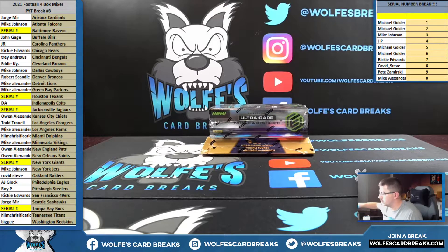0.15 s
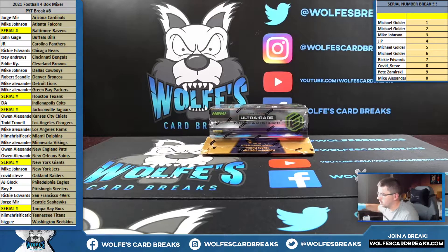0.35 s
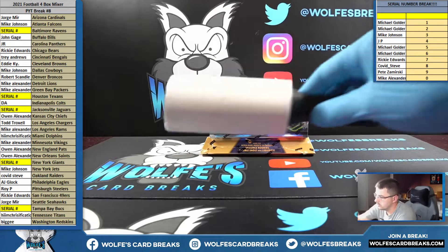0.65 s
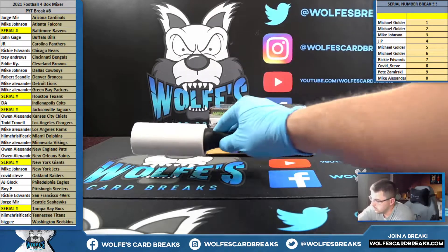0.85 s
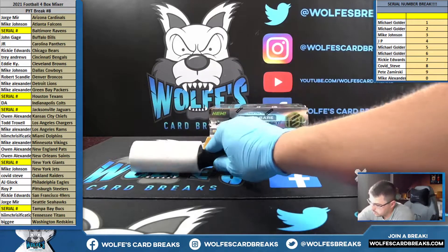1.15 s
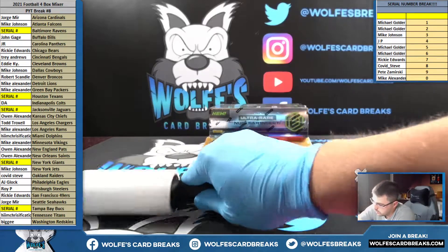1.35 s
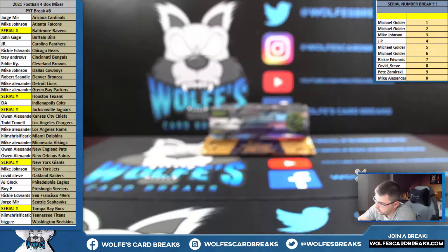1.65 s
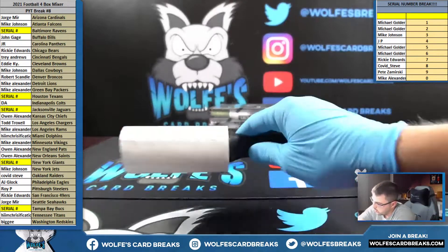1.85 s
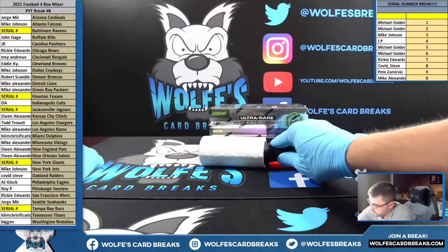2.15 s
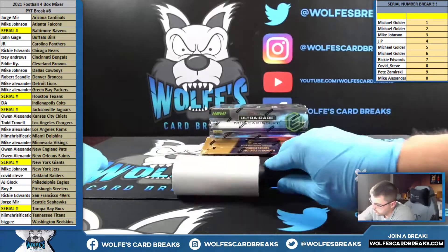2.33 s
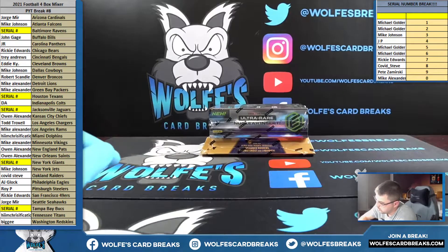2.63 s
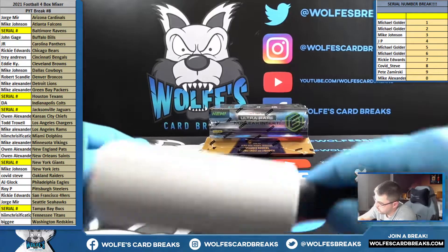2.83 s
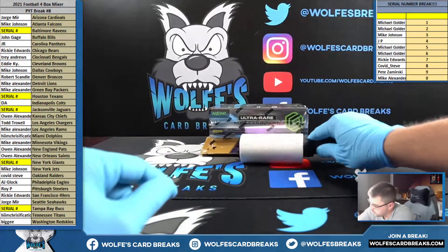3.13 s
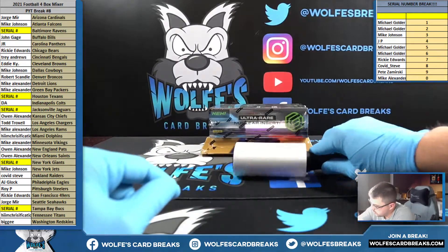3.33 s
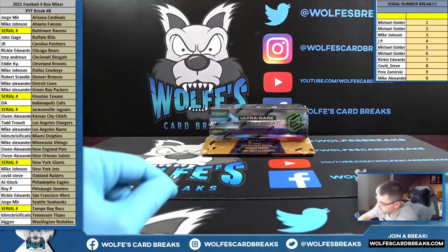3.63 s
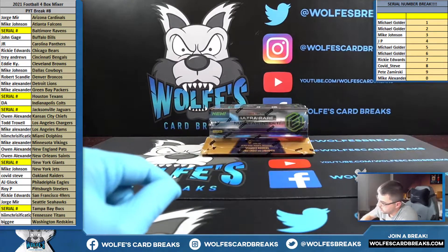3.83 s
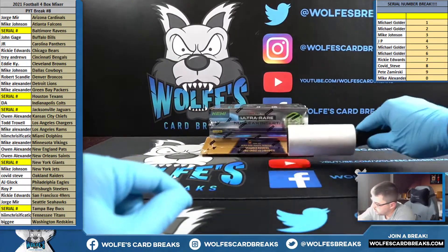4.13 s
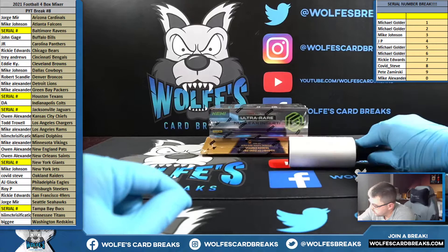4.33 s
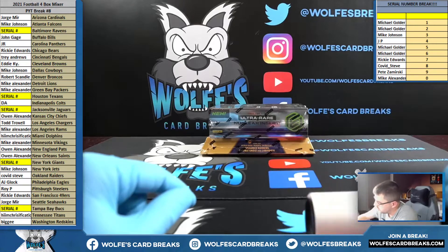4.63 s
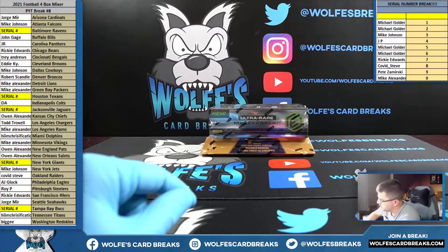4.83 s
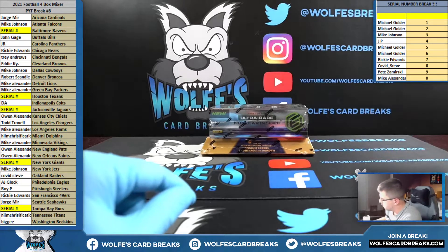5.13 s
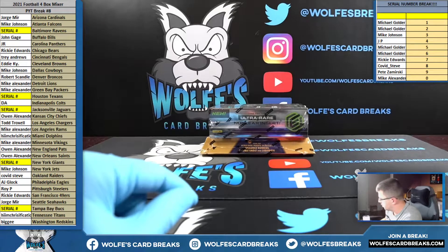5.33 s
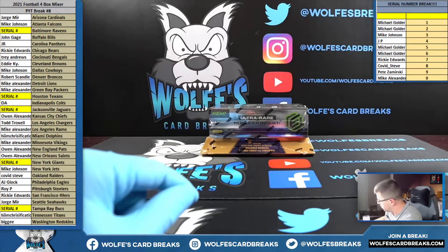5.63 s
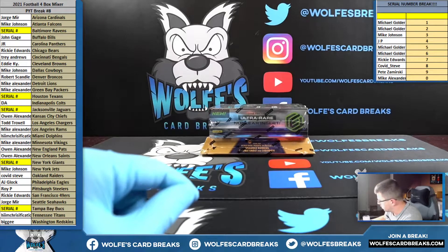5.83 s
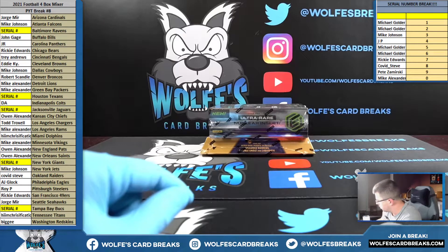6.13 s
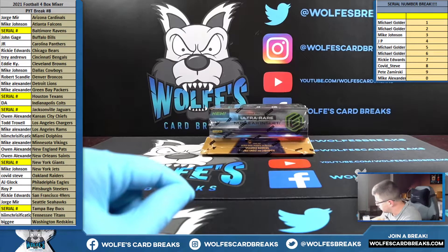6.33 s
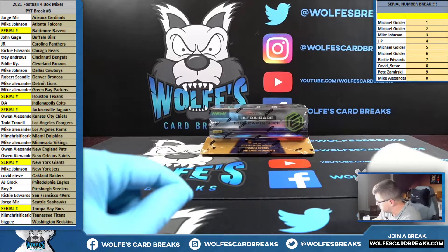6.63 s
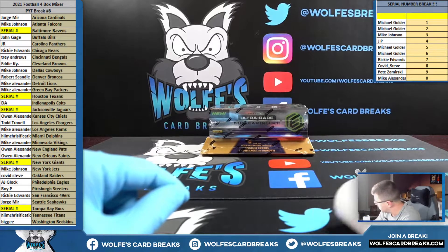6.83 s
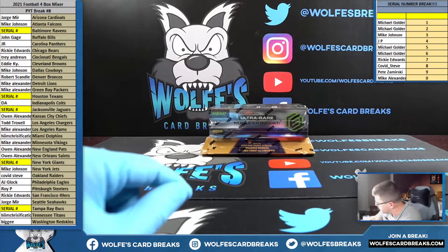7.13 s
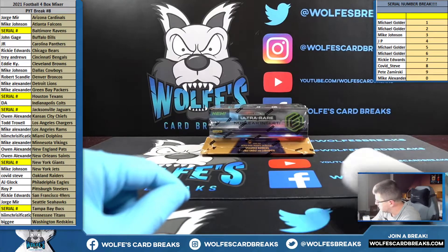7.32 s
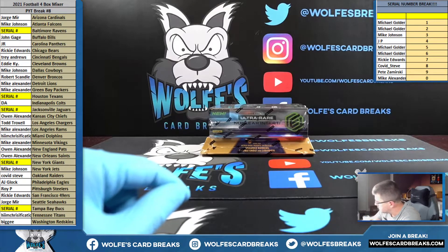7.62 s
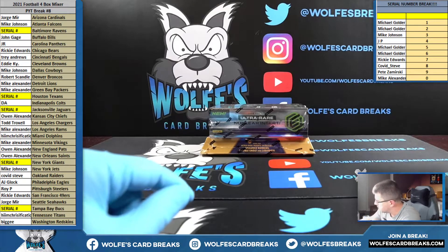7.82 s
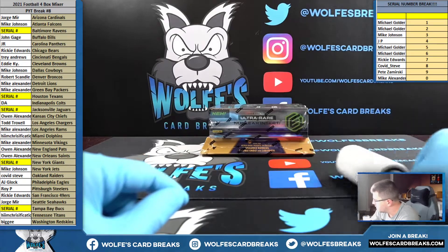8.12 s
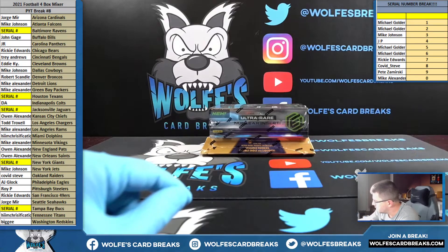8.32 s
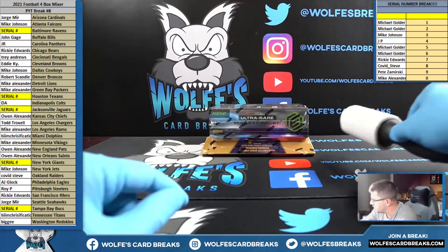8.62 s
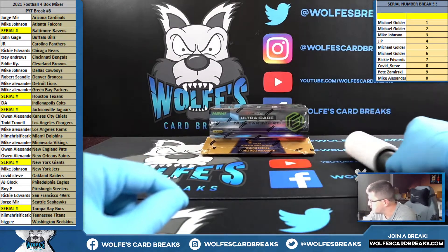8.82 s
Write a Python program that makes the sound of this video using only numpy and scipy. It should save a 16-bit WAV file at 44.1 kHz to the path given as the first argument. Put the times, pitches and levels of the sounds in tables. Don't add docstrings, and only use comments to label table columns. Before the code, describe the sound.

Sticky tape-like tearing comes in separate bursts as a lint roller rolls over a mat. The hollow roll clacks on its handle and the table answers with dull, rumbling thuds. Between bursts there are tiny rustles, faint air hiss and low hum. Four longer pulls are followed by five shorter, more hurried ones with firmer knocks, heard close and dry with only a little room reverberation.

```python
import sys
import numpy as np
from scipy import signal
from scipy.fft import rfft, irfft
from scipy.io import wavfile
from scipy.ndimage import uniform_filter1d, map_coordinates

SR = 44100
rng = np.random.default_rng(int(sys.argv[2]) if len(sys.argv) > 2 else 0)


def put_to_file(sound):
    columns = np.atleast_2d(sound).T
    safe = np.clip(columns, -1, 1)
    whole_steps = np.round(safe * 32767)
    wavfile.write(sys.argv[1], SR, whole_steps.astype(np.int16))


def amplitude_ratio(level_db):
    exponent = np.asarray(level_db, float) / 20
    return 10 ** exponent


N = 395577

# (touch-down [s], wait before the pull [s], speeding up [s], steady pull [s],
#           peel level at full speed [dB])
STROKES = [(-0.5, 0.1, 0.2, 0.2, -47), (0.95, 0.11, 0.1, 0.44, -44), (2.015, 0.075, 0.2, 0.38, -44),
           (3.1, 0.103, 0.165, 0.355, -44.5), (4.183, 0.06, 0.18, 0.41, -46.5),
           (5.296, 0.092, 0.16, 0.14, -44), (6.045, 0.033, 0.09, 0.2, -44.5),
           (6.72, 0.045, 0.08, 0.13, -45), (7.34, 0.05, 0.04, 0.18, -45.5), (8.01, 0.033, 0.07, 0.195, -49),
           (8.69, 0.025, 0.155, 0.06, -46)]
# (multiple of its ring [1], level [dB], t60 [s])
ROLL_MODES = [(1.002, 4.3, 0.045), (1.15, -3, 0.036), (1.9, -25, 0.04)]
RUSTLE_EDGE_DB = -14


def level(x, db):
    return x * amplitude_ratio(db) / np.sqrt(np.mean(x ** 2))


def colour(x, points):
    hz, db = np.transpose(points)
    size = 8192
    bins = np.maximum(np.fft.rfftfreq(size, 1 / SR), 1)
    log_gain = np.interp(np.log(bins), np.log(hz), db) * np.log(10) / 20
    cepstrum = irfft(log_gain)
    cepstrum[1:size // 2] *= 2
    cepstrum[size // 2 + 1:] = 0
    response = irfft(np.exp(rfft(cepstrum)))
    return signal.fftconvolve(x, response)[:N]


def high(x, hz):
    return signal.sosfilt(signal.butter(2, hz, "high", fs=SR, output="sos"), x)


def ring(modes, seconds, travel=0.):
    t = np.arange(int(seconds * SR)) / SR
    out = 0
    for hz, db, t60 in modes:
        since = np.maximum(t - travel / np.sqrt(hz), 0)
        decay = np.exp(-np.log(1000) * since / t60)
        out = out + amplitude_ratio(db) * np.sin(2 * np.pi * hz * since) * decay
    return out


def add(out, s, sound):
    i = max(int(s * SR), 0)
    out[i:i + len(sound)] += sound[:N - i]


def walk(rate):
    k = int(SR / rate)
    held = np.repeat(rng.standard_normal(N // k + 1), k)
    return 2.07 * uniform_filter1d(held, k)[:N]


def grains(per_s, scatter_db):
    hit = rng.random(N) < per_s / SR
    return hit * rng.standard_normal(N) * amplitude_ratio(scatter_db * rng.exponential(size=N))


def patches(shape, per_s, per_khz):
    rows = np.linspace(0, per_khz * SR / 2000, shape[0])
    cols = np.linspace(0, per_s * N / SR, shape[1])
    relief = rng.standard_normal((200, 800))
    return 1.37 * map_coordinates(relief, np.meshgrid(rows, cols, indexing="ij"), order=1)


def every_ms():
    return np.arange(0, N / SR + .002, .001)


def along(rows):
    s, *columns = np.transpose(rows)
    return [np.interp(np.arange(N) / SR, s, c) for c in columns]


def hush():
    # (frequency [Hz], density [dB per Hz])
    air_shape = [(18, -13), (27, -8), (31, -37), (42, -17), (62, -5), (80, -10), (90, -23.5), (115, -10),
                 (150, -22.5), (240, -15.5), (300, -23), (620, -25), (1000, -32.5), (2100, -38.5),
                 (3300, -48.5), (16000, -56)]
    # (frequency [Hz], level [dB])
    hum_tones = [(25, -58.5), (60, -58.5), (119, -71)]
    air = level(colour(rng.standard_normal(N), air_shape), -55.5) * amplitude_ratio(.7 * walk(9))
    t = np.arange(N) / SR
    hum = 0
    for hz, db in hum_tones:
        hum = hum + np.sqrt(2) * amplitude_ratio(db + 1.7 * walk(4.1)) * np.sin(2 * np.pi * hz * t)
    return air + hum


def stray_bands(mid):
    hz, s, spectrum = signal.stft(mid, SR, nperseg=1024)
    chance = rng.random((len(hz) // 24 + 1, len(s) // 3 + 1))
    tiles = np.kron(chance < .06, np.ones((24, 3)))[:len(hz), :len(s)]
    turns = np.exp(2j * np.pi * rng.random(spectrum.shape))
    treble = hz[:, None] > 10000
    return signal.istft(spectrum * turns * tiles * treble, SR, nperseg=1024)[1][:N]


def room(x):
    t60_s, tail_db = 0.37, -13.5
    t = np.arange(SR // 2) / SR
    tail = rng.standard_normal(len(t)) * np.exp(-np.log(1000) * t / t60_s) * (t > .004)
    tail = signal.lfilter([1], [1, -.4], tail)
    return signal.fftconvolve(x, tail / np.sqrt(np.sum(tail ** 2)))[:N] * amplitude_ratio(tail_db)


def leaning(column, slopes, rest_db, lead_s=0.):
    # (time [s], rolling rumble [dB], sway [dB])
    load = [(1.15, -57, -49), (1.42, -40, -47), (2.44, -39, -33), (3.5, -39, -36), (4.3, -62, -45),
            (4.6, -42, -36), (5.58, -41, -42), (6.22, -35, -41), (6.45, -58, -40), (6.9, -34, -42),
            (7.5, -43, -36), (8.17, -44, -35), (8.86, -42, -41)]
    t = every_ms()
    power = amplitude_ratio(rest_db) ** 2
    for row in load:
        since = t - row[0] + lead_s
        fall_db = np.maximum(-slopes[0] * since, slopes[1] * since)
        power = power + amplitude_ratio(row[column] - fall_db) ** 2
    return along(np.transpose([t, 10 * np.log10(power)]))[0]


def desk(rumble_db, sway_db):
    # (frequency [Hz], level [dB], t60 [s])
    panel_modes = [(106.6, -2.5, 0.34), (149.6, -3, 0.38), (184.7, -2.5, 0.37), (238, -0.5, 0.17),
                   (265.9, 0.46, 0.18), (305, -0.5, 0.16), (334.4, -4, 0.26), (364, -5.5, 0.21),
                   (402.3, -6, 0.069), (448.6, -9, 0.17), (511, -6, 0.069), (612, -11, 0.09),
                   (780, -15, 0.04), (1050, -21, 0.03)]
    # (frequency [Hz], level [dB], t60 [s])
    leg_modes = [(66.8, -2.2, 0.43), (101.9, -2.5, 0.39)]
    # (time [s], peak [dB], contact [ms], tilt [dB per octave])
    landings = [
        (0.949, -29.5, 1.9, 2),
        (3.088, -33, 3.6, -2),
        (4.177, -28, 2.6, 0),
        (5.29, -22.5, 1.7, -0.7),
        (6.036, -14.5, 1.3, -0.3),
        (6.707, -15.5, 0.94, 1.5),
        (7.327, -20, 2.0, -3),
        (7.999, -21.5, 1.5, 0.3),
        (8.676, -22.5, 2.7, 1),
    ]
    # (time [s], peak [dB], contact [ms], tilt [dB per octave])
    rolling_bumps = [(1.291, -15, 1.2, 8.5), (1.526, -18.5, 2.5, -0.5), (2.211, -30.5, 2.4, -2),
                     (2.338, -22.5, 2.0, -4), (2.413, -21, 2.5, -1), (2.592, -20, 2.9, -2),
                     (3.308, -26.5, 4.2, 0.3), (3.388, -27.5, 2.0, 0.3), (3.42, -20, 1.9, 0.3),
                     (3.503, -24, 1.76, -1), (3.691, -33, 1.4, -1), (4.461, -23.5, 3.2, -6),
                     (4.508, -18.5, 2.6, 0), (4.644, -21.5, 3.1, 1.5), (4.816, -31.5, 2.5, -1),
                     (5.434, -23, 4, -3), (5.52, -25.5, 2.55, -1), (6.228, -17.5, 2.6, -0.5),
                     (6.347, -27.5, 1.4, 3.5), (6.82, -23, 2.8, -3), (6.866, -15, 2.0, -3.5),
                     (7.464, -22.5, 2.6, 0), (8.118, -25, 3.1, -6), (1.322, -25, 1.8, 6),
                     (1.343, -25, 1.8, 6), (2.006, -40, 3, -2), (2.305, -30, 2.5, -1), (5.611, -25, 2.5, 0),
                     (6.164, -24, 2, 1), (6.719, -24, 1, 3), (6.736, -23, 1.3, 2), (6.994, -24, 2.5, 0),
                     (7.49, -25, 2.5, 0), (8.028, -33, 2, 1), (8.26, -33, 3, -2), (8.775, -30, 2.6, -1),
                     (8.845, -31, 2.4, 0)]
    lumps = uniform_filter1d(grains(1100, 1.4), size=60)
    rumble = high(signal.fftconvolve(lumps, ring(panel_modes, .3, 0.0826))[:N], 98.0)
    bumps = np.zeros(N)
    thuds = sorted(landings + rolling_bumps)
    place_db = 2 * rng.standard_normal((len(thuds), len(panel_modes)))
    for (s, db, ms, tilt_db), place in zip(thuds, place_db):
        shove = np.hanning(int(ms * SR / 1000) + 2)
        modes = [(hz, d + p + tilt_db * np.log2(hz / 250), t60)
                 for (hz, d, t60), p in zip(panel_modes, place)]
        panel = ring(modes + [(227, 7.0, 0.03)], 0.32, 0.031)
        thud = signal.fftconvolve(panel, shove / shove.sum())
        add(bumps, s + 0.0039, -thud * amplitude_ratio(db - 11))
    sway = signal.fftconvolve(rng.standard_normal(N), ring(leg_modes, .8))[:N]
    bumps = high(high(bumps, 86.0), 87.0)
    rumble = level(rumble, -0.44) * amplitude_ratio(rumble_db)
    return bumps + rumble + level(high(sway, 40.0), -1.07) * amplitude_ratio(sway_db)


def coasting():
    # (time [s], level [dB])
    coast = [
        (1.62, -75),
        (1.66, -67),
        (1.84, -68),
        (1.93, -80),
    ]
    # (frequency [Hz], width [Hz], level [dB])
    handle = [(1340, 100, -3), (1700, 70, 1), (2140, 70, -3), (2620, 92, -6), (3390, 60, -2.5)]
    modes = [(hz, db, np.log(1000) / (np.pi * width)) for hz, width, db in handle]
    rub = signal.fftconvolve(grains(3000, 1.7), ring(modes, .06))[:N]
    inside = np.abs(np.arange(N) / SR - 1.775) < .16
    return level(rub, 0) * amplitude_ratio(along(coast)[0] + 1.4 * walk(30.1)) * inside


def scraping():
    # (time [s], half length [s], level [dB], frequency
    # [Hz])
    narrow_bursts = [(1.2, 0.1, -53, 2200), (1.335, 0.045, -33, 345), (8.72, 0.04, -58, 1000),
                     (2.026, 0.012, -63, 2150), (2.076, 0.01, -58, 1500), (4.195, 0.012, -52, 2200),
                     (4.385, 0.08, -50.5, 2120), (2.076, 0.01, -52, 2200), (1.55, 0.04, -59, 680),
                     (1.42, 0.14, -57, 1600), (1.76, 0.14, -68, 1500), (2.5, 0.06, -55, 600),
                     (3.71, 0.04, -54, 620), (5.35, 0.025, -53, 740), (5.195, 0.012, -71, 4600),
                     (5.3, 0.06, -66, 7200), (5.35, 0.02, -62, 5300), (5.82, 0.03, -69, 6900),
                     (5.55, 0.04, -57, 700), (5.7, 0.05, -58, 620), (6.2, 0.06, -51, 600), (6.4, 0.035, -57, 950),
                     (6.93, 0.05, -59, 800), (7.05, 0.03, -62, 700), (7.86, 0.04, -61, 750), (8.15, 0.03, -51, 650),
                     (8.24, 0.05, -56, 640), (8.86, 0.05, -56, 620)]
    ring_cycles = 22
    out, friction = np.zeros(N), grains(5000, 1.5)
    for s, half, db, hz in narrow_bursts:
        i, k = int((s - 2 * half) * SR), int(4 * half * SR)
        sound = signal.fftconvolve(friction[i:i + k], ring([(hz, 0, ring_cycles / hz)], .04))[:k]
        fade = amplitude_ratio(RUSTLE_EDGE_DB * np.linspace(-2, 2, k) ** 2)
        add(out, i / SR, level(sound, db) * fade)
    return out


def slaps():
    # (time [s], peak [dB], treble [dB])
    cracks = [(0.0014, -51, 2), (0.9446, -34.5, -23), (0.9836, -46, -40), (1.0385, -46, -16),
              (2.0053, -58, -6), (2.0662, -50, -8), (2.0735, -40, -22), (2.2238, -49, -11),
              (2.6035, -48, -10), (3.0929, -46, -17), (3.5159, -42, -12), (4.1898, -37.5, -23),
              (4.2353, -51, -11), (4.5127, -32, -16), (5.3038, -41.5, -25), (5.782, -46, -12),
              (5.899, -59, -18), (6.0398, -41.5, -19), (6.113, -43, -12), (6.3723, -39, -15),
              (6.4617, -52, -14), (6.7131, -41, -38), (7.334, -44, -20), (7.39, -44, -6), (7.419, -44, -4),
              (7.8416, -58, -22), (7.866, -60, -6), (6.089, -44, -8), (6.762, -47, -8), (7.047, -51, 0),
              (8.039, -47, -8), (8.312, -50, -10), (8.623, -60, -25), (7.345, -48, -22),
              (8.0042, -37.5, -23), (8.2073, -37, -4), (8.3963, -53, -14), (8.6584, -56, -6),
              (8.6843, -34, -10)]
    out = np.zeros(N)
    t = np.arange(SR // 10) / SR
    noise = rng.standard_normal((len(cracks), len(t)))
    for (s, db, treble_db), hiss in zip(cracks, noise):
        crack = hiss * (np.exp(-t / 0.0042) + 0.28 * np.exp(-t / 0.0092))
        top = high(crack, 5800.0)
        add(out, s, amplitude_ratio(db - 3) * (crack + top * (amplitude_ratio(treble_db + 10.0) - 1)))
    return colour(out, [(300, 4), (1400, 0), (2300, 11.0), (5000, 1.0), (16000, -11)])


def swell(sound):
    return sound * (1 - np.exp(-np.arange(len(sound)) / SR / .002))


def ticks():
    # (time [s], peak [dB], ring [Hz])
    grip_ticks = [(1.339, -39, 522), (2.055, -47, 638), (2.286, -44, 888), (2.484, -41, 770),
                  (3.379, -47, 705), (3.431, -42, 659), (3.705, -44, 565), (4.867, -49, 727),
                  (5.537, -43, 522), (5.699, -44, 600), (5.775, -45, 603), (6.109, -45, 576),
                  (6.185, -41, 584), (6.283, -41, 649), (6.35, -38, 800), (6.373, -37, 589),
                  (6.739, -33, 528), (6.813, -39, 650), (6.921, -43, 584), (6.949, -40, 680),
                  (7.419, -48, 832), (7.433, -26.5, 680), (7.459, -38, 900), (7.483, -33, 603),
                  (7.615, -31, 600), (7.844, -48, 746), (8.079, -33, 732), (8.119, -32, 705),
                  (8.131, -32, 660), (8.229, -46, 581), (8.31, -43, 1000), (8.316, -42, 614)]
    # (multiple of the ring [1], level [dB], t60 [s])
    upper_modes = [(1.45, -6, .016), (2.1, -18, .012)]
    damping = .6
    out = np.zeros(N)
    for s, db, hz in grip_ticks:
        modes = [(hz * k, d, t60 * damping) for k, d, t60 in ROLL_MODES]
        modes += [(hz * k, d, t60) for k, d, t60 in upper_modes]
        add(out, s - .0018, swell(ring(modes, .05)) * amplitude_ratio(db - 5))
    return out


def rattle():
    # (time [s], peak [dB], ring [Hz])
    knocks = [(0.986, -44, 740), (1.03, -46, 714), (1.257, -47.5, 619), (1.299, -33, 638),
              (1.352, -36, 697), (1.635, -46.5, 590), (2.072, -39, 672), (2.227, -48, 635),
              (2.349, -30.5, 650), (2.599, -45, 690), (3.251, -39, 650), (3.326, -44, 670),
              (3.399, -44, 656), (3.445, -37, 673), (3.513, -43, 630), (4.363, -45, 686),
              (4.473, -37.5, 723), (4.512, -43, 640), (4.653, -44.5, 704), (8.7, -49, 720)]
    # (time [s], peak [dB], ring [Hz])
    jolts = [
        (0.014, -36.5, 700),
        (0.948, -42, 625),
        (2.011, -50, 647),
        (3.111, -50, 670),
        (4.19, -33, 730),
        (5.327, -41, 640),
        (6.043, -33, 588),
        (6.712, -35.5, 556),
        (7.335, -45.5, 674),
        (8.004, -46, 753),
    ]
    out = np.zeros(N)
    hits = sorted(jolts + knocks)
    chance = rng.standard_normal((len(hits), len(ROLL_MODES) + 1))
    for (s, db, hz), draw in zip(hits, chance):
        third_db = -16 + 28 * np.log2(hz / 650)
        modes = [(hz * k, d + 1.2 * c, t60) for (k, d, t60), c in zip(ROLL_MODES, draw)]
        modes += [(.87 * hz, -8, .03), (3.02 * hz, third_db, .03), (3.17 * hz, third_db - 4, .015)]
        knock = swell(ring(modes, .1))
        add(out, s - .0018, knock * amplitude_ratio(db + 2.5))
        add(out, s + 0.02 + 0.00417 * draw[-1], knock * amplitude_ratio(db - 9.5))
    return out


def catching():
    # (time [s], peel change [dB])
    hops = [(1.278, -5.0), (1.347, -3.0), (1.372, -2.5), (1.461, 2.5), (1.53, -4.5), (1.541, 3.0),
            (2.132, 2.0), (2.156, -3.0), (2.214, -5.0), (2.321, -6.0), (2.391, 2.0), (2.42, -4.0),
            (2.595, -4.5), (2.609, 2.0), (3.313, -4.0), (3.412, -4.5), (3.434, -2.5), (3.471, 2.0),
            (3.509, -4.5), (3.575, 2.0), (3.692, -6.5), (3.709, 3.0), (4.352, -2.5), (4.382, 3.0),
            (4.464, -3.0), (4.483, 2.0), (4.5, -4.5), (4.59, 2.0), (4.65, -3.5), (5.437, -4.5), (5.51, 2.5),
            (5.61, -3.0), (5.664, 2.0), (6.107, -5.5), (6.167, 4.5), (6.195, 4.5), (6.229, -3.5),
            (6.263, -2.5), (6.299, 2.5), (6.318, -5.0), (6.811, 2.0), (6.837, 4.5), (6.924, 3.5),
            (6.952, 5.0), (7.445, 4.5), (7.502, -4.5), (7.54, 3.5), (7.569, -6.0), (7.59, 5.5),
            (8.053, -3.0), (8.123, 6.5), (8.15, -5.0), (8.21, 7.0), (8.741, 3.5), (8.777, -9.5),
            (8.847, 3.0), (8.864, -2.5), (8.877, 4.5)]
    t = every_ms()
    change_db = sum(db * np.exp(-((t - s) / .008) ** 2) for s, db in hops)
    return along(np.transpose([t, change_db]))[0] * .88


def places():
    # (sheen band [dB], top octave [dB])
    mat_places = [(0, 1), (-1, 0), (0, 1), (0, 0), (0, -1), (2.5, -5), (3, -3), (2, -2), (0, 0), (0, 0),
                  (0, 1)]
    stroke = np.searchsorted(np.transpose(STROKES)[0], np.arange(N) / SR) - 1
    return np.transpose(mat_places)[:, stroke]


def pulling():
    # (first tug under full speed [dB], tiring [dB], brightness [dB],
    #                       favoured band [Hz], lift-off [dB per s])
    grips = [(-8, -4, -6, 2300, 220), (-16, -3, -4, 2700, 260), (-10, -3, -4, 2800, 270),
             (-8.5, -4, -4.5, 2750, 330), (-12, -1, -3, 2550, 270), (-7, -11, -2.5, 2850, 240),
             (-5, -9, -1, 3200, 200), (-5, -3, -2, 3150, 190), (-3, 0, -2.5, 2950, 350),
             (-2, -9, -2, 2950, 330), (-9, -2, -1, 3000, 250)]
    # (time [s], half length [s], level [dB], brightness [dB])
    rustles = [(0.4, 0.3, -84, -3), (0.05, 0.1, -75, 2), (0.72, 0.3, -74, -2), (1.02, 0.07, -63, -5),
               (1.8, 0.15, -69, -7), (2.95, 0.3, -79, -2), (4.0, 0.3, -73, -9), (5.03, 0.06, -69, 1),
               (5.27, 0.04, -71, -8), (5.8, 0.05, -65, -7), (7.19, 0.12, -74, -12), (7.284, 0.03, -68, -5),
               (6.69, 0.02, -73, -8), (7.85, 0.04, -73, -14), (8.41, 0.04, -71, -5), (8.55, 0.15, -79, -5)]
    touch_db, settle_db_per_s, tug_s = -57, 230, 0.022
    bright_per_db, wedge_hz_per_db, slowest_db = 0.25, 25, -25
    t = every_ms()
    power, bright_db, wedge_hz = amplitude_ratio(-100) ** 2, 0 * t, 0 * t
    for (touch, wait, rise, steady, db), grip in zip(STROKES, grips):
        tug_db, tire_db, gloss_db, hz, lift = grip
        times = touch + np.cumsum([wait - tug_s, tug_s, rise, steady, 1])
        pace_db = np.interp(t, times, [tug_db - 15, tug_db, 0, tire_db, tire_db - lift], -99)
        now = t >= touch
        contact = amplitude_ratio(touch_db - settle_db_per_s * np.abs(t - touch)) ** 2
        power = power + amplitude_ratio(db + pace_db) ** 2 + now * contact
        slow_db = np.maximum(pace_db - np.interp(t, times[2:4], [0, tire_db]), slowest_db)
        bright_db[now] = (gloss_db + bright_per_db * slow_db)[now]
        wedge_hz[now] = (hz + wedge_hz_per_db * slow_db)[now]
    for s, half, db, gloss_db in rustles:
        rustle = amplitude_ratio(db + RUSTLE_EDGE_DB * ((t - s) / half) ** 2) ** 2
        bright_db = (bright_db * power + gloss_db * rustle) / (power + rustle)
        power = power + rustle
    return along(np.transpose([t, 10 * np.log10(power), bright_db, wedge_hz]))


def peel(peel_db, bright_db, peak_hz):
    # (frequency [Hz], density [dB per Hz])
    snap_shape = [(530, -14.5), (900, -8), (990, -11.5), (1260, -11.5), (1580, -8.5), (2180, -3),
                  (3320, -2.5), (4690, -5.5), (7570, -9), (10300, -15.5), (14600, -17.5), (15700, -23.5)]
    snaps = level(colour(grains(14000, 1.25), snap_shape), 0)
    hz, s, spectrum = signal.stft(snaps, SR, nperseg=512)
    hz, at = hz[:, None], np.minimum(s * SR, N - 1).astype(int)
    wedge_db = 2.5 * np.exp(-((hz - peak_hz[at]) / 170) ** 2)
    catch_db, (sheen_db, top_db) = catching(), places()
    treble_db = (bright_db[at] + 7.5 + .4 * catch_db[at]) / (1 + np.exp((6500 - hz) / 700))
    treble_db = treble_db + sheen_db[at] * np.exp(-((hz - 7600) / 1100) ** 2)
    treble_db = treble_db + top_db[at] / (1 + np.exp((12800 - hz) / 600))
    grip_db = 2.2 * patches(spectrum.shape, 40, 6) + .8 * patches(spectrum.shape, 20, .8)
    shaped = signal.istft(spectrum * amplitude_ratio(wedge_db + treble_db + grip_db), SR, nperseg=512)[1][:N]
    return shaped * amplitude_ratio(peel_db + catch_db - 0.5 + .6 * walk(60))


def scene():
    airborne = peel(*pulling()) + rattle() + ticks() + slaps() + coasting() + scraping()
    rumble_db = leaning(1, (105, 68), -65)
    sway_db = leaning(2, (105, 33), -68, lead_s=0.07)
    floor = desk(rumble_db, sway_db) + hush()
    mid = airborne + room(airborne) + floor
    return np.array([mid, mid])


def roll_off(x):
    return signal.sosfilt(signal.butter(12, 16470, fs=SR, output="sos"), x)


def record(dry):
    low_pass = signal.ellip(10, .2, 45, 15850, fs=SR, output="sos")
    mid = signal.sosfilt(low_pass, dry[0])
    side = stray_bands(mid)
    return roll_off(np.array([mid + side, mid - side]))


dry = scene()
out = record(dry)
put_to_file(out)
```